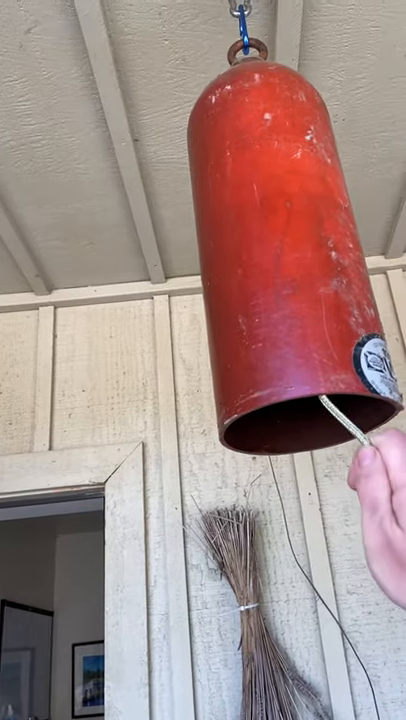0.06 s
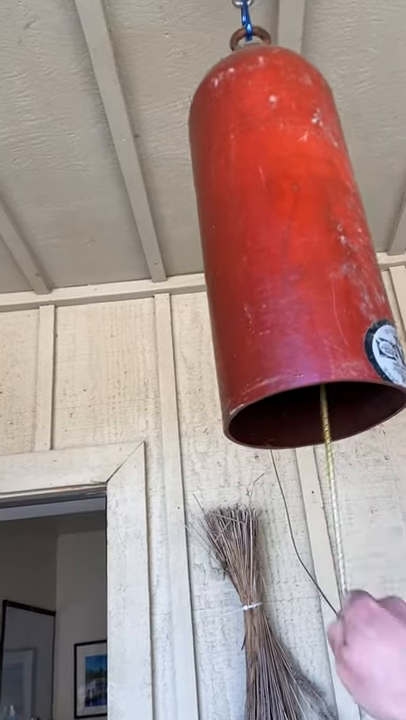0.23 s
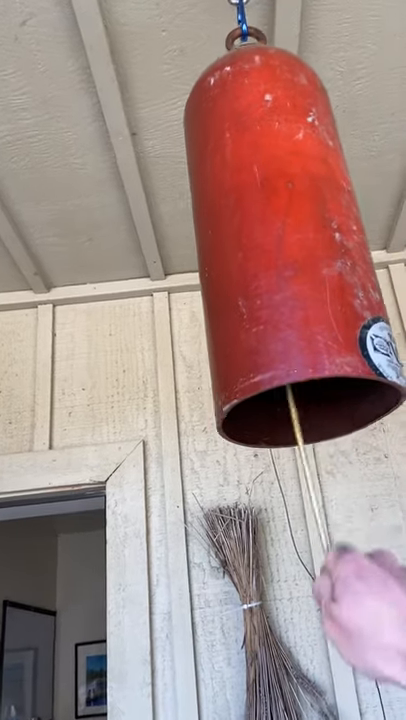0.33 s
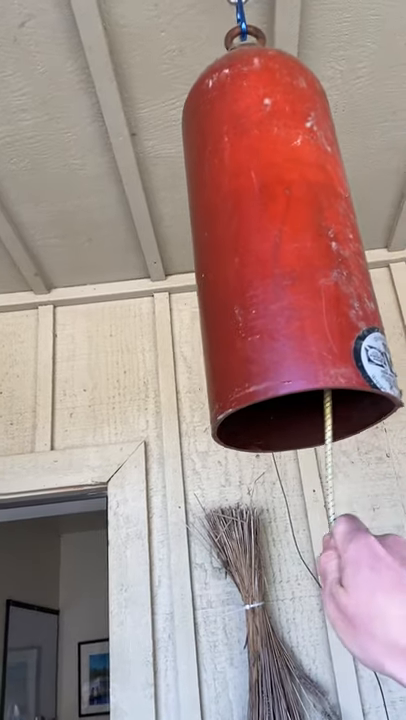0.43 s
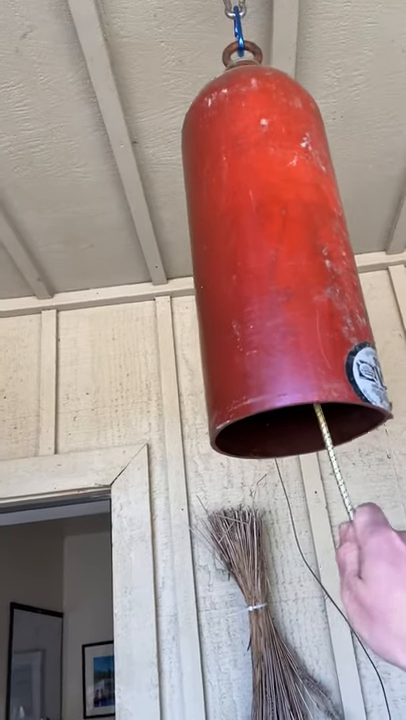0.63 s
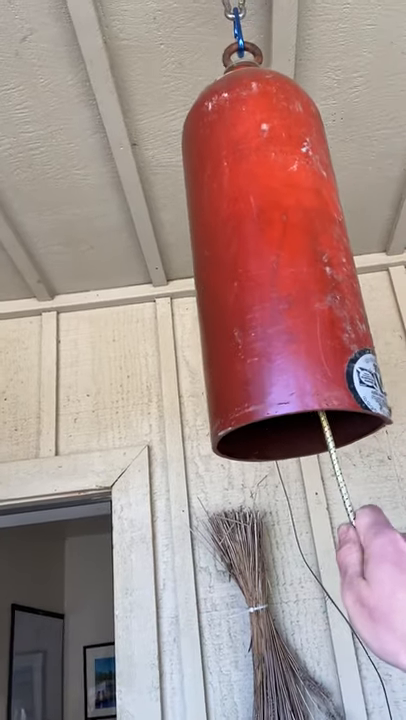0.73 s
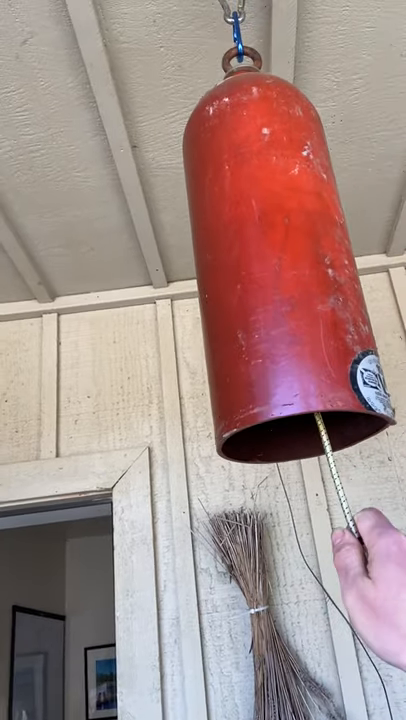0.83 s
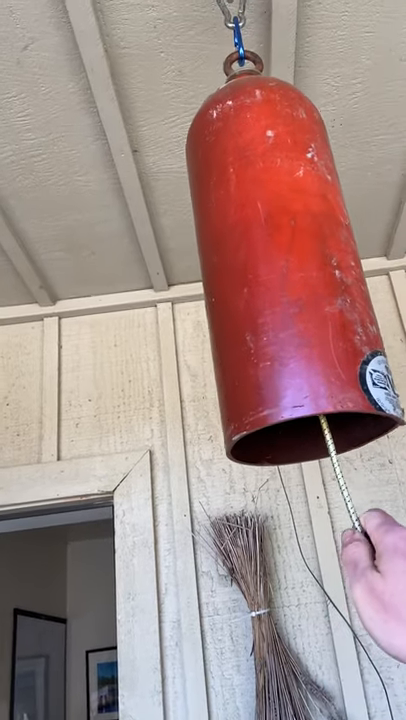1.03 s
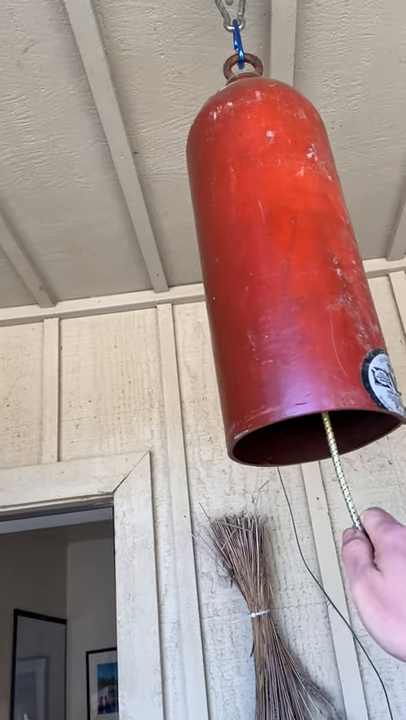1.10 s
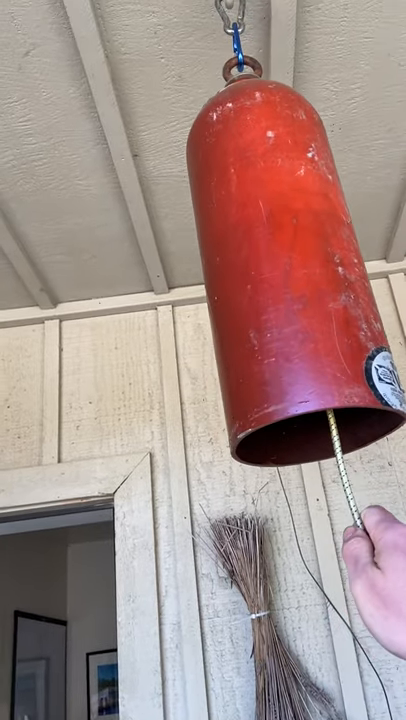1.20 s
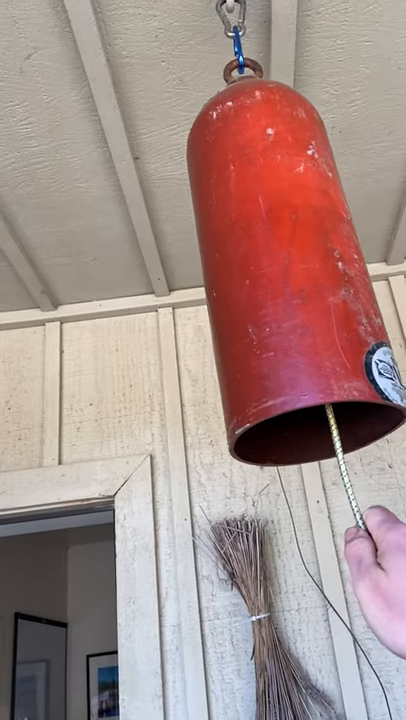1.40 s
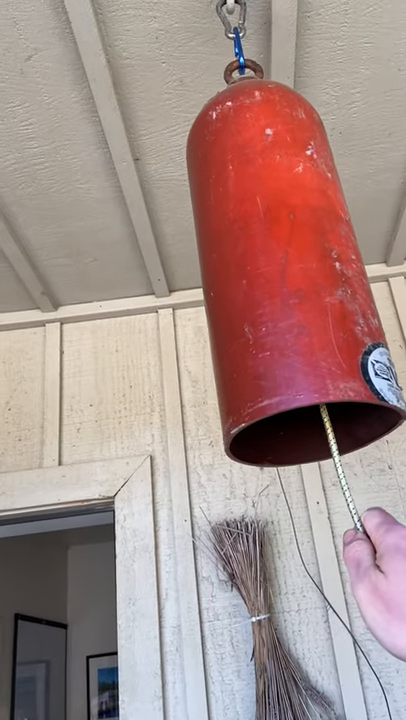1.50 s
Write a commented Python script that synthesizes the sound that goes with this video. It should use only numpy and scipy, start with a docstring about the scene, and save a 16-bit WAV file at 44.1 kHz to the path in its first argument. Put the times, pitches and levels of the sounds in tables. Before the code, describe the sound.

One hard strike on a hanging steel bell, its bright ring fading into a hum.

```python
"""A steel tank bell under a porch

A bell cut from a diving tank still hums from an earlier blow when its clapper strikes once.
The impact gives a hard, broadband clank and excites the normal modes of the wall; close pairs
of modes beat as they decay. The porch reverberates, and a small bird chirps far off in quiet air.
An automatic gain control ducks under the blow, then recovers."""
import sys
import numpy as np
from scipy import signal
from scipy.fft import rfft, irfft, next_fast_len
from scipy.io import wavfile
from scipy.ndimage import uniform_filter1d, minimum_filter1d, map_coordinates

SR = 44100
rng = np.random.default_rng(int(sys.argv[2]) if len(sys.argv) > 2 else 0)


def wav_record(signal):
    """Record a signal, one row per channel, as 16-bit PCM in the file named by sys.argv[1]."""
    frames = np.transpose(np.atleast_2d(signal))
    bounded = np.clip(frames, -1, 1)
    # unit amplitude maps onto the largest positive 16-bit level
    quanta = np.round(bounded * 32767).astype(np.int16)
    wavfile.write(sys.argv[1], SR, quanta)


N = 68355
STRIKE_S = .2213


def amp(db):
    """Amplitude ratio of a level in decibels."""
    return 10 ** (np.asarray(db) / 20)


def along(points, hz):
    """Interpolation of (frequency_hz, value) points on a logarithmic frequency axis."""
    knots_hz, values = np.transpose(points)
    return np.interp(np.log(hz + 1), np.log(knots_hz + 1), values)


def clock():
    """Sample times in seconds."""
    return np.arange(N) / SR


def filtered(x, response):
    """Linear filtering: the spectrum is multiplied by a frequency response."""
    size = next_fast_len(N + SR // 2)
    return irfft(rfft(x, size) * response(np.fft.rfftfreq(size, 1 / SR)), size)[..., :N]


def noise(spectrum, side_db):
    """Partly coherent stereo noise of rms 1: sum and difference of two coloured noises."""
    mid, side = filtered(rng.standard_normal((2, N)), lambda hz: amp(along(spectrum, hz)))
    pair = np.array([mid + amp(side_db) * side, mid - amp(side_db) * side])
    return pair / np.sqrt(np.mean(pair ** 2) + 1e-20)


def fade(t, t60, rise_s):
    """Envelope of a damped vibration: a quick rise, then a fall of 60 dB in t60 seconds."""
    return (1 - np.exp(-t / rise_s)) * amp(-60 * t / t60)


def wobble(knots_per_s):
    """Slow random modulation: a spline through Gaussian values."""
    return map_coordinates(rng.standard_normal(64), [1 + clock() * knots_per_s], mode="mirror")


def reverberation(x, decay):
    """Diffuse reflections: convolution with a noise tail whose decay time depends on frequency."""
    hz, t, spectra = signal.stft(rng.standard_normal(SR // 2), SR, nperseg=256)
    tail = signal.istft(spectra * amp(-60 * t / along(decay, hz)[:, None]), SR, nperseg=256)[1]
    return signal.fftconvolve(np.atleast_2d(x), tail[None] / np.linalg.norm(tail), axes=1)[:, :N]


def outdoors():
    """Ambient noise: steady air and a dull rumble that swells and sinks."""
    # spectrum of the air: frequency_hz, relative_density_db
    air_spectrum = [(25, -32), (50, -15), (72, 0), (100, -10), (140, -19), (185, -9), (260, -19),
                    (500, -22), (900, -31), (2000, -39), (4000, -42), (5400, -37), (7000, -54),
                    (16000, -60)]
    # spectrum of the rumble: frequency_hz, relative_density_db
    rumble_spectrum = [(60, -13.5), (130, -14), (180, 5), (205, -1.5), (260, -20), (500, -24), (820, -21),
                       (1100, -30), (2500, -60), (6000, -120)]
    # envelope of the rumble: time_s, level_db
    swell = [(0, -80), (.15, -72), (.45, -75), (.56, -70), (.63, -62), (.75, -67), (.84, -64.5), (.95, -81),
             (1.55, -85)]
    swell_db = np.interp(clock(), *np.transpose(swell))
    air = amp(-72) * noise(air_spectrum, side_db=-20)
    return air + amp(swell_db) * noise(rumble_spectrum, side_db=-21)


def bird(chirp_s=.06):
    """Falling whistles from a distance, where the yard's reverberant field outweighs the direct sound."""
    # chirps: start_s, start_hz, end_hz, relative_level_db
    chirps = [(0, 5400, 5000, -77), (.03, 2900, 2820, -70), (.8, 4700, 3850, -80), (.86, 5600, 4900, -78),
              (.9, 4700, 3700, -80), (.94, 6400, 5250, -72), (1.29, 4800, 3700, -83),
              (1.32, 6400, 5150, -73)]
    # reverberation of the yard: frequency_hz, t60_s
    yard_decay = [(3000, .5), (7000, .55)]
    song = np.zeros(N)
    for start_s, start_hz, end_hz, db in chirps:
        progress = np.clip((clock() - start_s) / chirp_s, 0, 1)
        hz = end_hz + (start_hz - end_hz) * (1 - progress) ** 2
        song += amp(db) * np.sin(np.pi * progress) * np.sin(2 * np.pi * np.cumsum(hz) / SR)
    return amp(-4) * song + amp(2) * reverberation(song, yard_decay)


def earlier_ring():
    """Free decay of two wall modes excited by the earlier blow."""
    # modes still ringing: pitch_hz, level_db, t60_s
    modes = [(1153.5, -78, 1.85), (1305.5, -73, 1.2)]
    t = clock()
    return sum(amp(db - 60 * t / t60) * np.sin(2 * np.pi * hz * t) for hz, db, t60 in modes)


def hum(t, pan_db, earlier_db=-23, earlier_t60_s=6):
    """Beating: the two lowest modes start in antiphase and swell as they drift into step."""
    since_s = clock() - STRIKE_S
    earlier = np.where(since_s < 0, amp(earlier_db - 60 * since_s / earlier_t60_s), 0)

    def mode(hz, db, t60):
        return amp(db) * (earlier + fade(t, t60, rise_s=.001)) * np.sin(2 * np.pi * hz * since_s)

    pair = mode(hz=417.6, db=-32.5, t60=6.1) - mode(hz=413.9, db=-37, t60=7.2)
    return amp([[pan_db / 2], [-pan_db / 2]]) * pair


def shimmer(t, count, level_db=-18):
    """High modal density: many weak modes at random pitches, the higher ones tending to die sooner."""
    # spectral envelope of the high modes: frequency_hz, relative_level_db
    spectrum = [(3500, -8.5), (4500, -7), (6300, 2.5), (6800, -6), (7350, 3.5), (8000, -5.5), (8800, -9.5),
                (9300, 1.5), (10000, -1.5), (11000, -10), (12500, -9.5), (13500, -15), (16000, -28.5)]
    low_hz, high_hz = spectrum[0][0], spectrum[-1][0]
    offsets, phases, lifetimes = rng.random((3, count))
    pitches_hz = low_hz + (high_hz - low_hz) * (np.arange(count) + offsets) / count
    gains = amp(along(spectrum, pitches_hz) + 3 * rng.standard_normal(count))
    t60s = .28 * (8000 / pitches_hz) ** .35 * 2 ** (lifetimes - .5)
    ring = sum(gain * fade(t, t60, rise_s=.0015) * np.sin(2 * np.pi * (hz * t + phase))
               for hz, gain, t60, phase in zip(pitches_hz, gains, t60s, phases))
    return amp(level_db) * ring / np.linalg.norm(gains)


def clapper(t):
    """Impact noise: after a faint scrape, brief contact gives a broadband clank and a thud."""
    # scrape of the swinging clapper: frequency_hz, relative_density_db
    scrape_spectrum = [(100, -14), (200, 0), (350, -6), (600, -12), (1000, -1), (1500, -20), (3600, -24),
                       (6000, -32), (16000, -48)]
    # clank of the contact: frequency_hz, relative_density_db
    clank_spectrum = [(40, -36), (150, -25), (240, -9), (500, -11), (640, -15), (770, -6), (950, -19),
                      (1300, 5.5), (1800, -3), (2300, 2), (3700, 2), (4600, -12), (7300, -14),
                      (8500, -20.5), (9800, -12), (12500, -23), (16000, -30)]
    # dull push of the blow: frequency_hz, relative_density_db
    thud_spectrum = [(25, -24), (45, -16), (70, 1), (105, 0), (150, -20), (185, 0), (300, -18), (1000, -45),
                     (3000, -120)]
    swing_at_s, swing_width_s, lead_in_s = .19, .02, .004
    rise_s, hold_s, t60_s = .0002, .006, .06  # envelope of the impact
    swing = amp(-58) * np.exp(-((clock() - swing_at_s) / swing_width_s) ** 2)
    scrape = swing * noise(scrape_spectrum, side_db=-17)
    lead_in = amp(-29) * np.exp(-np.abs(clock() - STRIKE_S) / lead_in_s)  # short rise into the clank
    impact = amp(-7 - 60 * np.maximum(t - hold_s, 0) / t60_s) * (1 - np.exp(-t / rise_s))
    clank = (lead_in + impact) * noise(clank_spectrum, side_db=-15)
    thud = amp(-43) * fade(t, t60=.7, rise_s=.005) * noise(thud_spectrum, side_db=-24)
    return scrape + clank + thud


def wall(t, rise_s, travel_s, sway_db=.6):
    """Normal modes: each sets in as the bending wave spreads round the tank and wavers as it swings."""
    # modes of the steel wall: pitch_hz, level_db, t60_s, left_minus_right_db
    modes = [(1153.5, -13.5, 1.85, 0), (1157.3, -38, 1.4, 0), (1304.8, -24.5, 1.57, 0),
             (1311.8, -40, 2.1, 2.5), (1424.6, -41.5, 1.4, 0.5), (1427.2, -30, 1.5, -3), (1570, -66, 2, 0),
             (2005, -42, .55, 2.5), (2201, -9, .52, -6), (2202, -48, 1.6, -1), (2353.6, -15.5, .68, -8),
             (2373.6, -19, .75, 5.5), (2379.1, -16, .56, -0.5), (2817.4, -16.5, .3, 1),
             (2824.6, -8.5, .45, -3), (3116, -29.5, .92, -3), (3140.4, -21, .68, -10), (3137, -38, 1.1, -2),
             (3531, -27.5, .62, 1), (3657, -11, .19, -1.5), (3696, -28, .52, -1.5), (3713.5, -9.5, .33, -2),
             (4010, -29, .5, -3), (4556, -27, .24, -2.5), (4856, -23.5, .25, -0.5), (4894, -20, .35, -4.5),
             (4998, -39.5, .75, 4), (5154, -19.5, .22, 3.5), (5160, -43.5, .75, 2), (5096, -42, .7, 4),
             (5600, -28, .32, -0.5), (5803, -30, .45, -0.5), (6179, -21, .3, 2), (6268, -32, .5, 0),
             (6350, -32.5, .42, -4), (6864, -42, .6, 0), (8250, -46, .45, 0), (8730, -50, .45, 0),
             (9260, -45, .42, 0), (9846, -39, .33, 0), (10060, -43, .33, 0), (10480, -48, .42, -0.5)]
    lowest_hz = modes[0][0]
    ring = np.zeros((2, N))
    for hz, db, t60, pan_db in modes:
        delay_s = travel_s * (np.sqrt(hz / lowest_hz) - 1)
        age_s = np.maximum(t - delay_s, 0)
        sway = amp(sway_db * np.array([wobble(knots_per_s=9) for _ in range(2)]))
        gains = amp([[db + pan_db / 2], [db - pan_db / 2]])
        ring += gains * sway * fade(age_s, t60, rise_s) * np.sin(2 * np.pi * hz * age_s)
    return ring


def scene():
    """Superposition of bell, porch and background, widened by a frequency-dependent phase shift."""
    # reverberation of the porch: frequency_hz, t60_s
    porch_decay = [(100, .3), (800, .42), (2000, .28), (4400, .38), (7000, .26), (12000, .2)]
    # stereo widening, the phase shift between left and right channels: frequency_hz, left_lead_rad
    phase_lead = [(0, 0), (1200, .15), (2200, 0.57), (3100, 1.45), (3700, 1.11), (5000, .6), (6200, 1.97),
                  (7050, 3), (7600, 3.25), (8500, 4.8), (10000, 7), (11500, 7.5), (12500, 7.5),
                  (13200, 9.4), (13900, 9.5), (15500, 10.5)]
    t = np.maximum(clock() - STRIKE_S, 0)  # seconds since the strike
    blow = clapper(t) + shimmer(t, count=150) + wall(t, rise_s=.0003, travel_s=.001)
    bell = blow + hum(t, pan_db=-1.6) + earlier_ring()
    sound = bell + amp(-20) * reverberation(blow, porch_decay) + bird() + outdoors()
    share = np.array([[.5], [-.5]])  # left advances by half the lead, right lags by half
    return filtered(sound, lambda hz: np.exp(1j * share * np.interp(hz, *np.transpose(phase_lead))))


def record(dry, limit_db=-9.5, hold_s=.19, recover_db_per_s=50, top_hz=16300):
    """Automatic gain control ducks, holds and recovers; soft saturation and a band limit follow."""
    power = np.abs(uniform_filter1d(np.mean(dry ** 2, axis=0), size=441))  # 10 ms average
    needed_db = np.minimum(limit_db - 10 * np.log10(power + 1e-12), 0)
    hold_samples = int(hold_s * SR) | 1
    held_db = minimum_filter1d(needed_db, hold_samples, origin=hold_samples // 2, mode="nearest")
    ramp_db = recover_db_per_s * clock()
    gain_db = np.minimum.accumulate(held_db - ramp_db) + ramp_db  # rises no faster than the ramp
    ducked = dry * amp(gain_db)
    rounded = ducked / (1 + (ducked / .85) ** 6) ** (1 / 6)
    return filtered(rounded, lambda hz: hz < top_hz)


dry = scene()
out = record(dry)
wav_record(out)
```